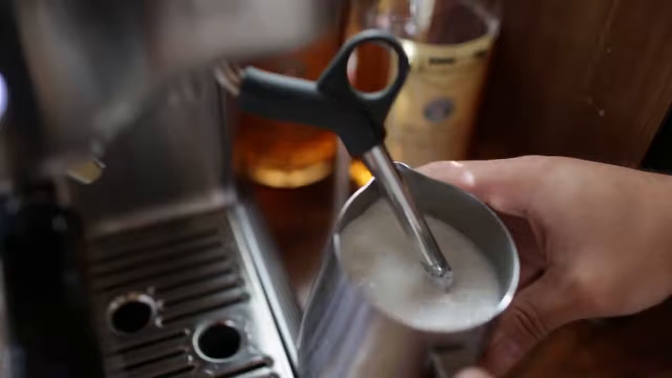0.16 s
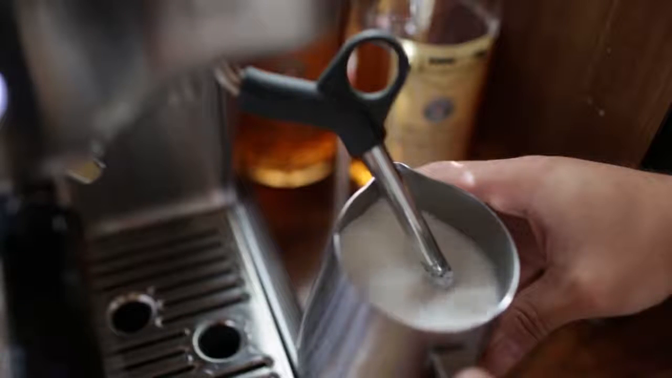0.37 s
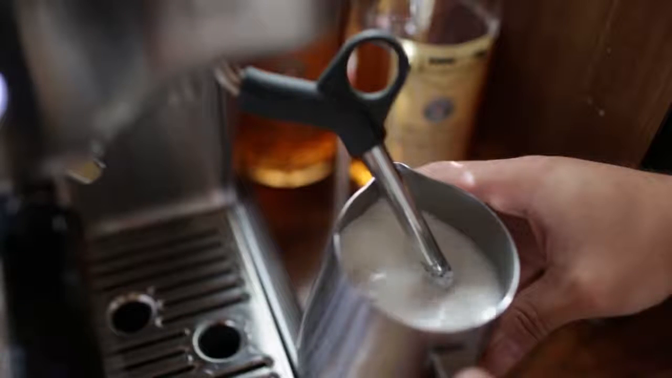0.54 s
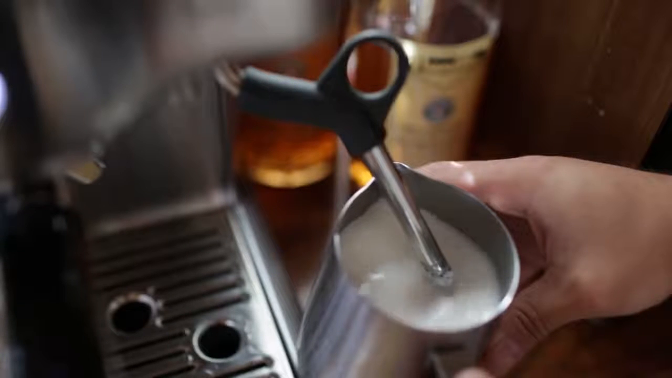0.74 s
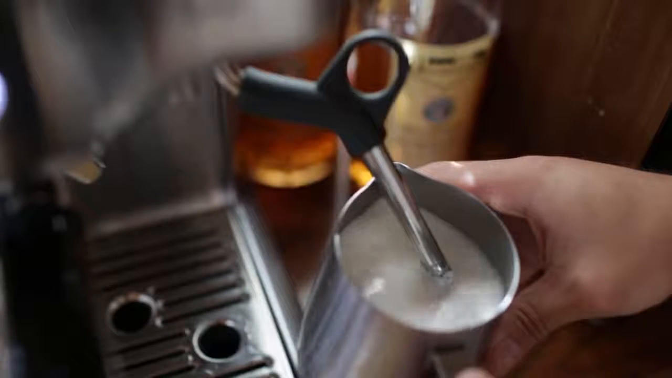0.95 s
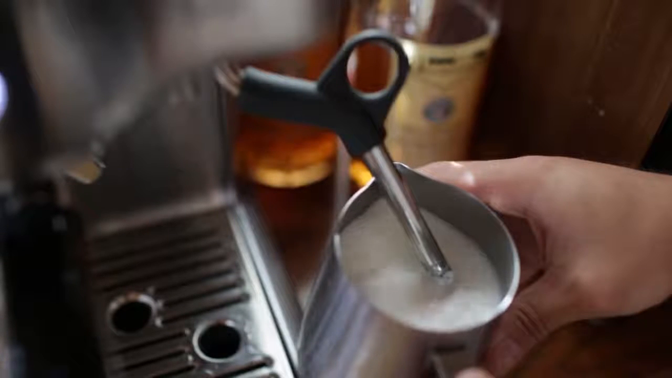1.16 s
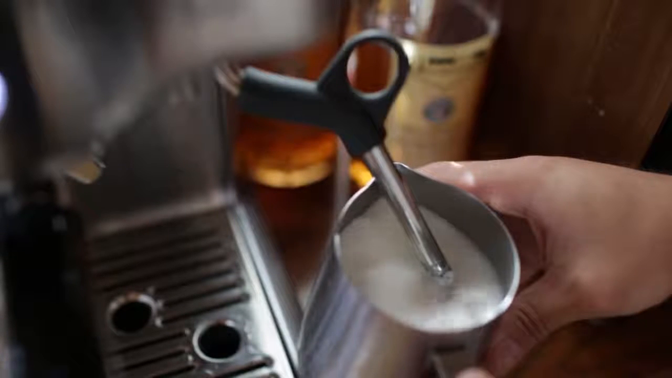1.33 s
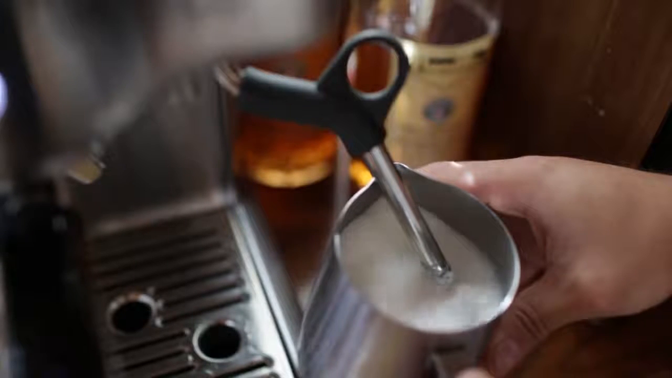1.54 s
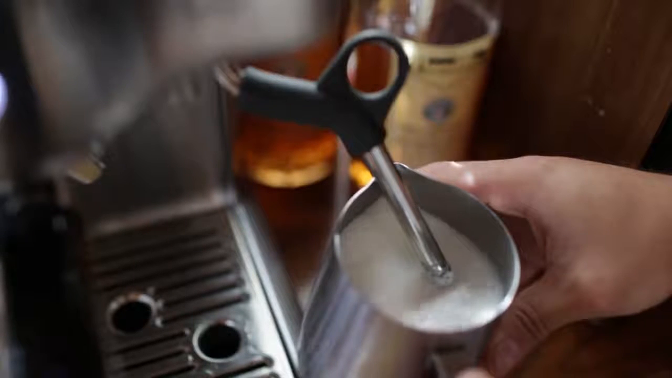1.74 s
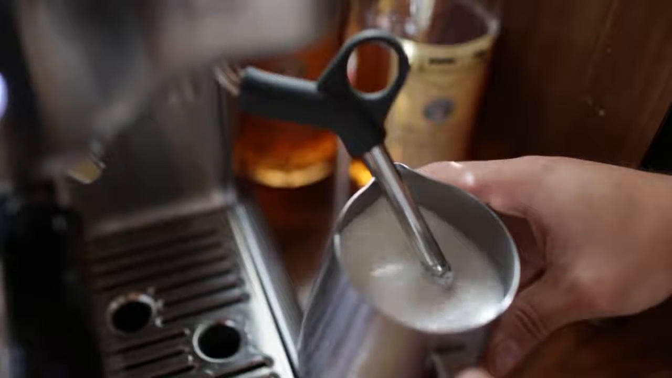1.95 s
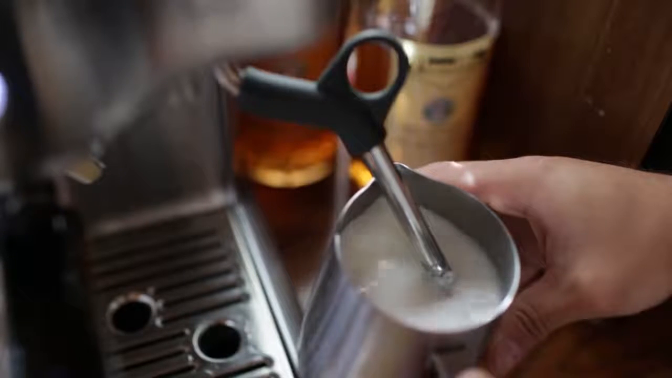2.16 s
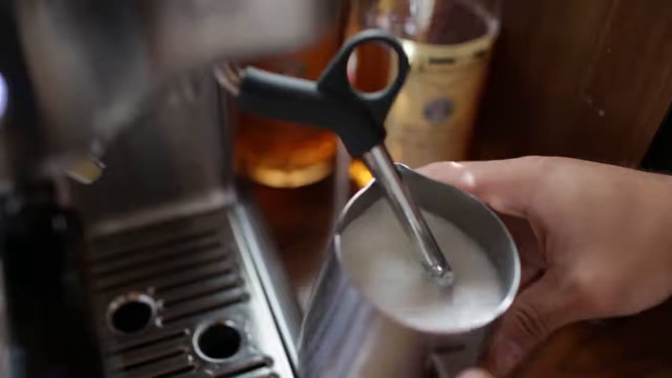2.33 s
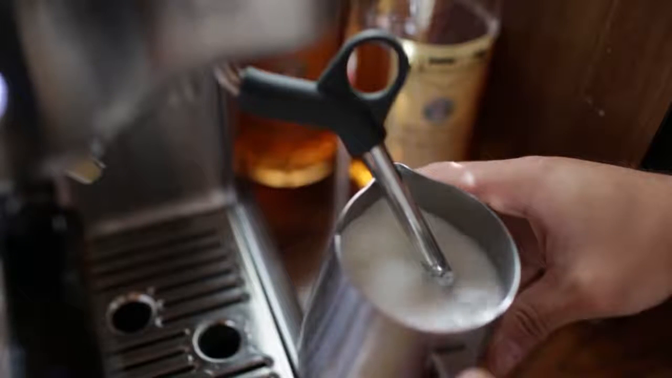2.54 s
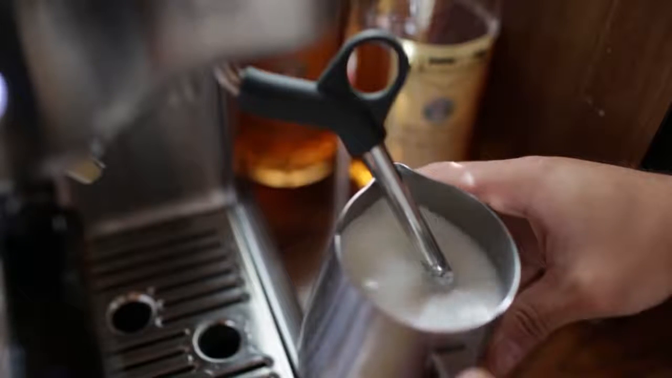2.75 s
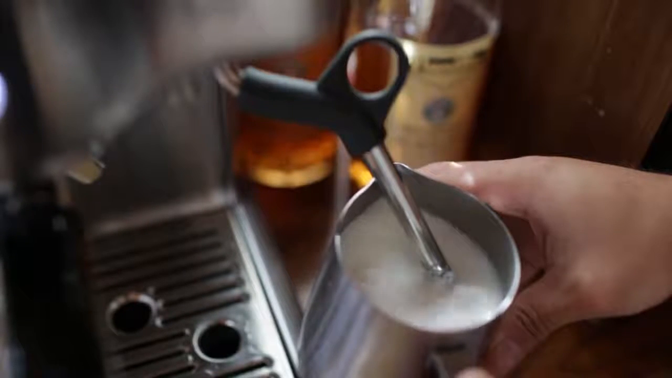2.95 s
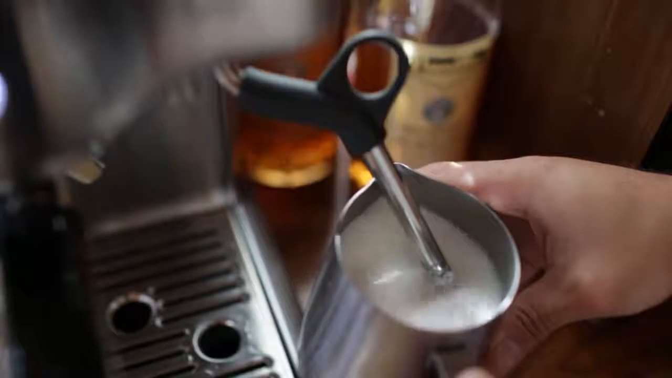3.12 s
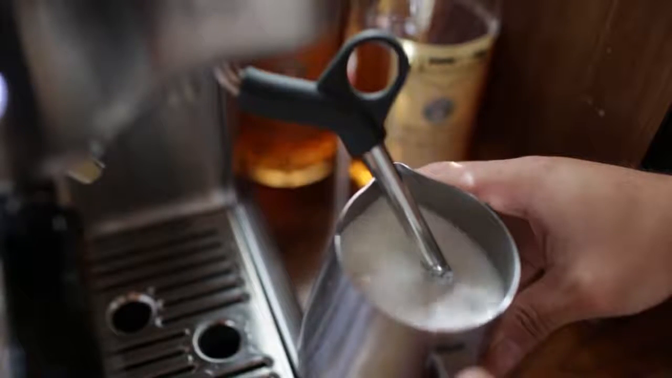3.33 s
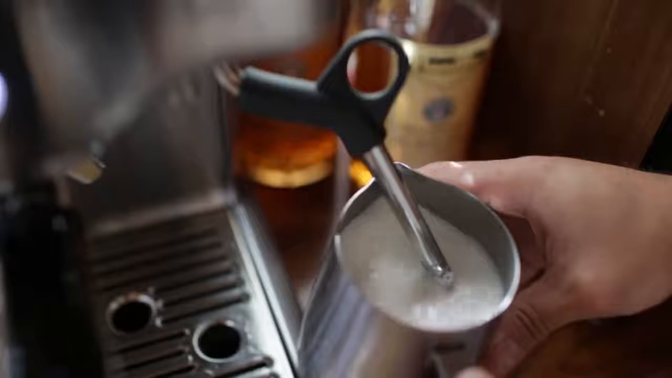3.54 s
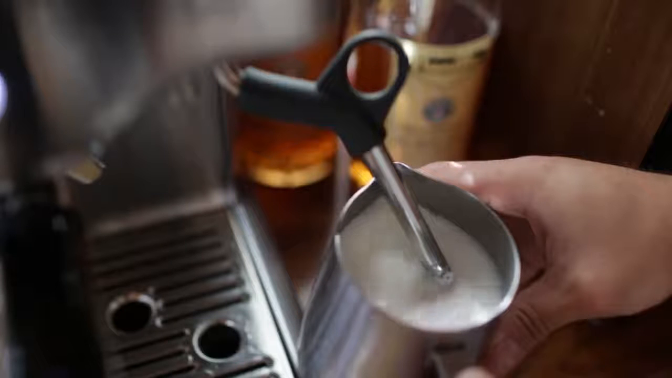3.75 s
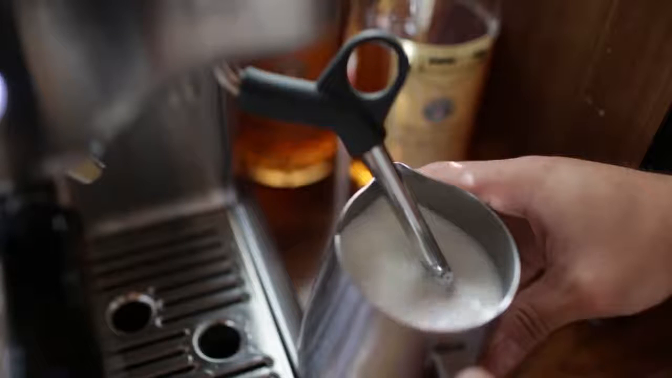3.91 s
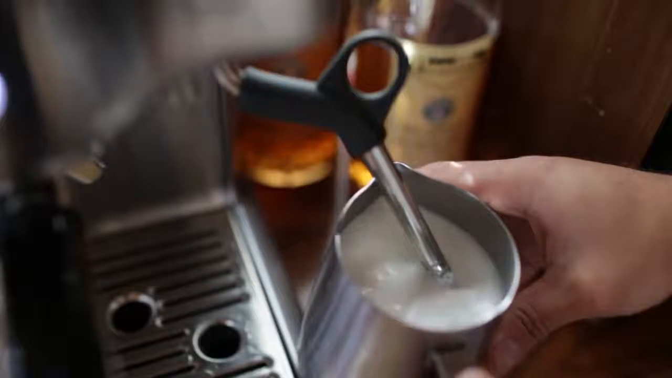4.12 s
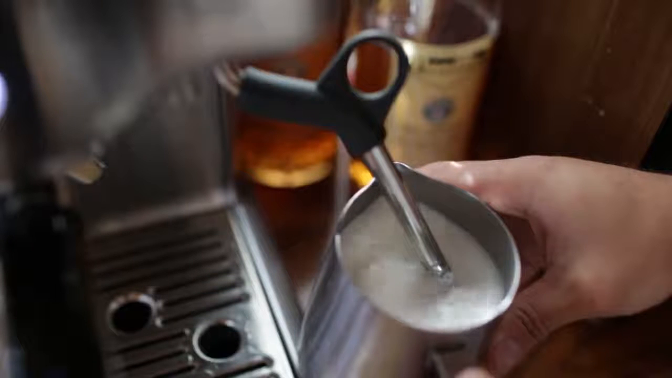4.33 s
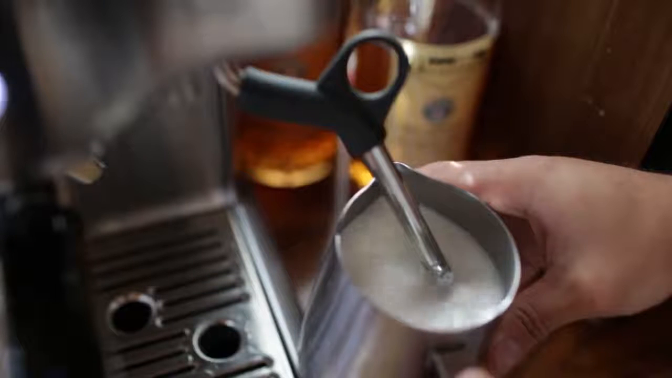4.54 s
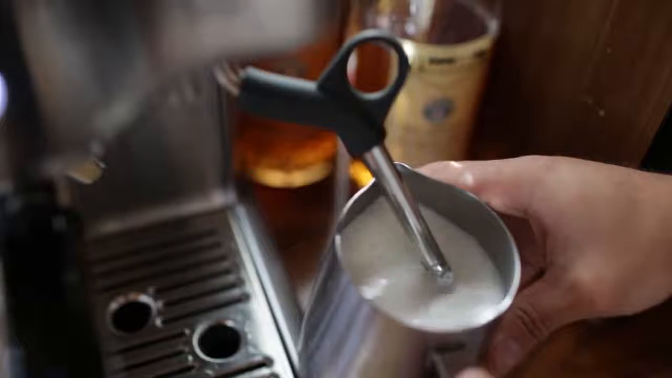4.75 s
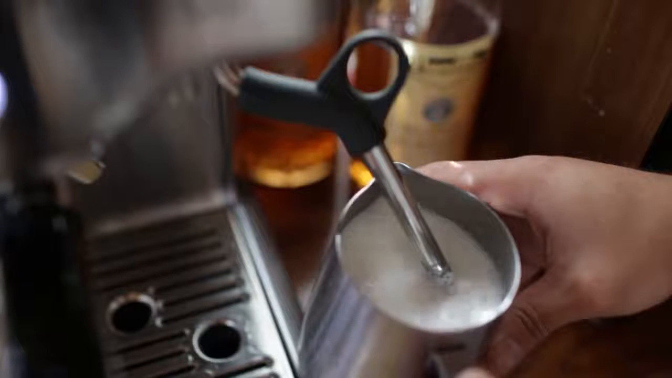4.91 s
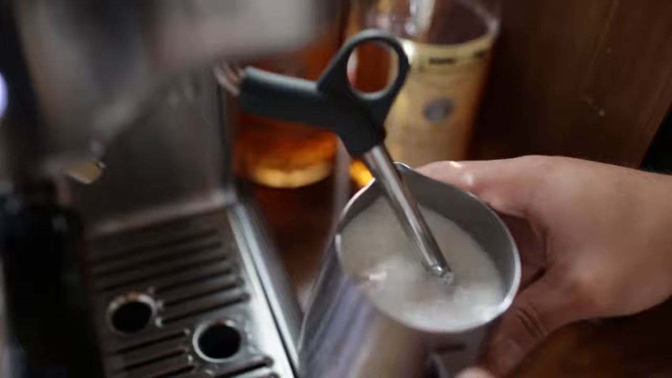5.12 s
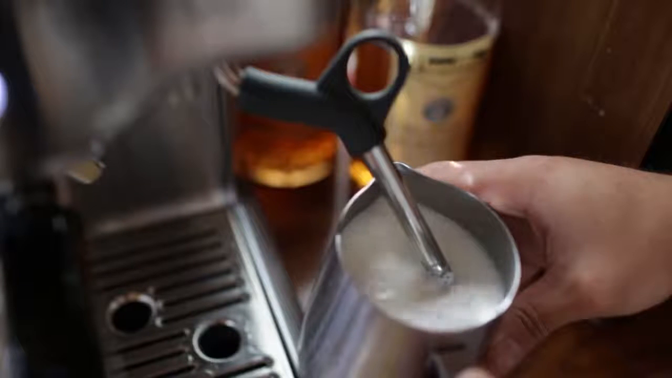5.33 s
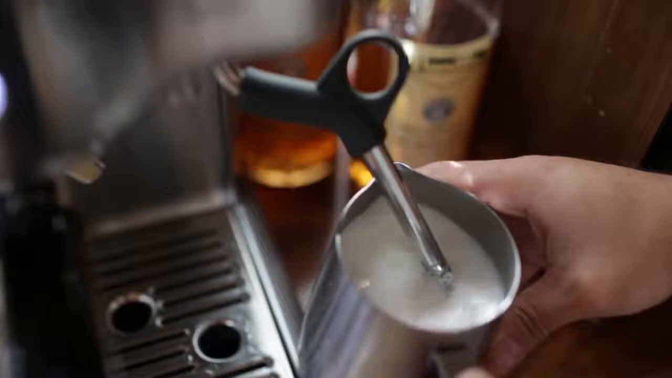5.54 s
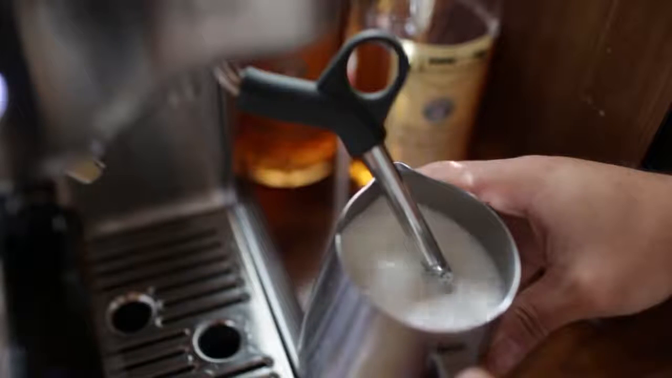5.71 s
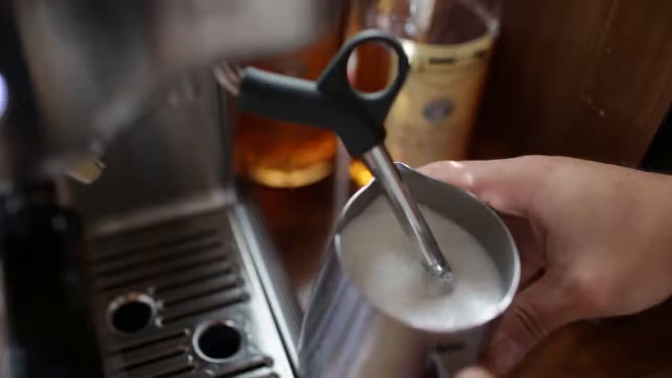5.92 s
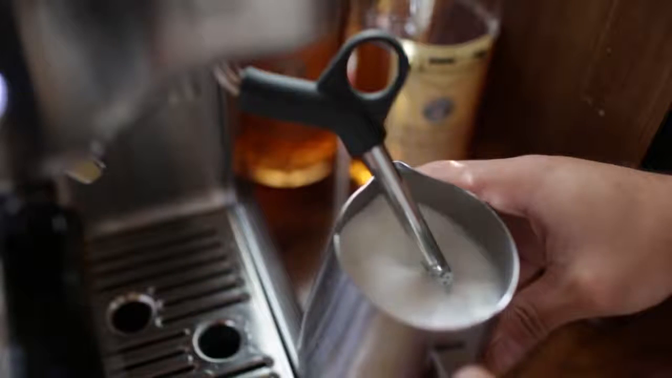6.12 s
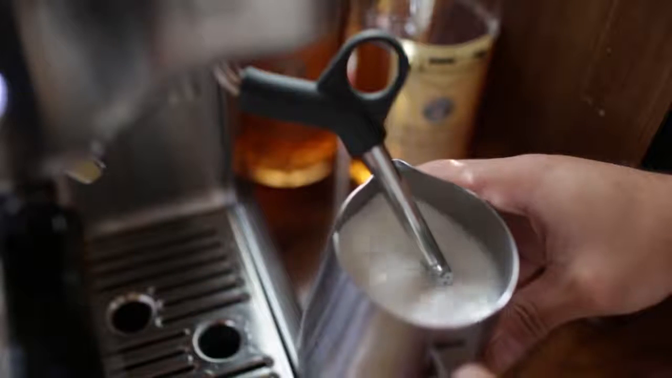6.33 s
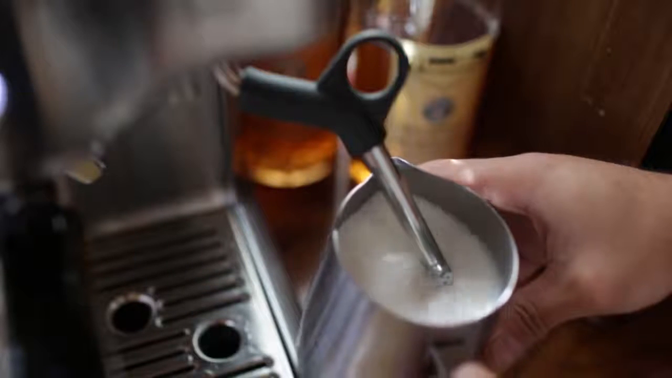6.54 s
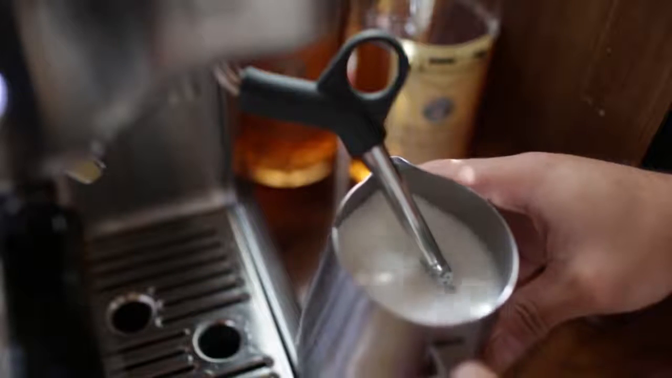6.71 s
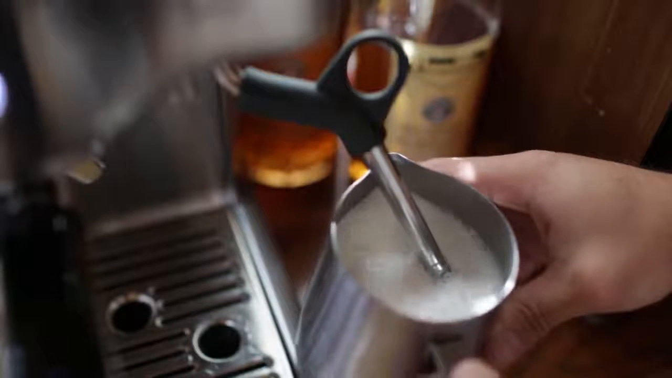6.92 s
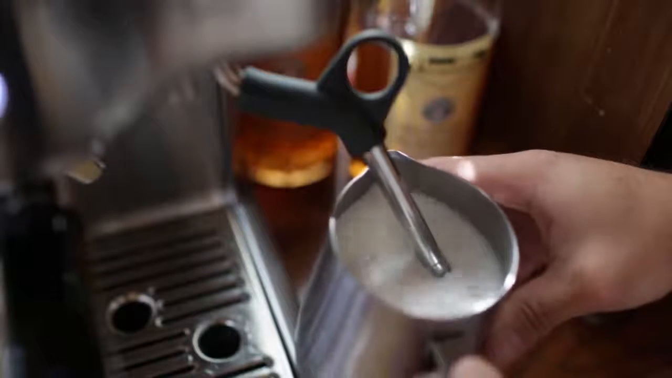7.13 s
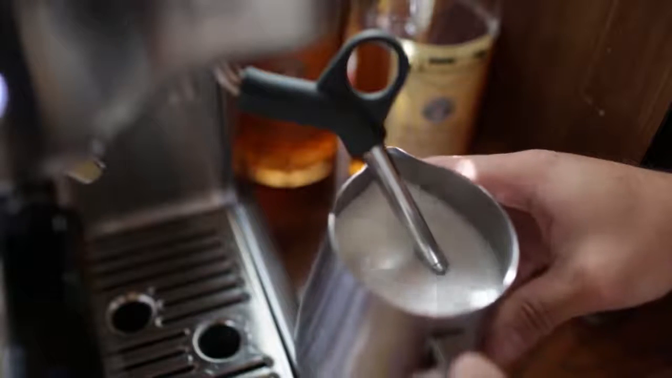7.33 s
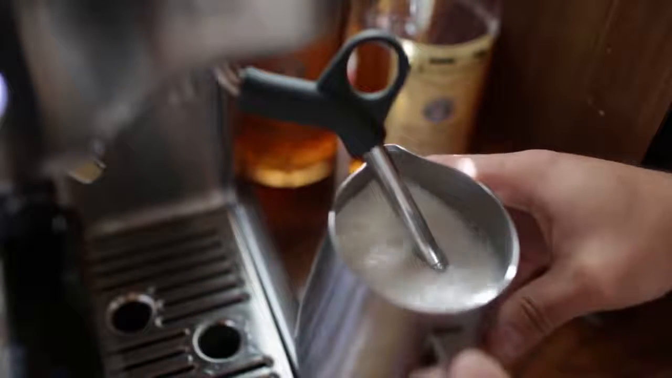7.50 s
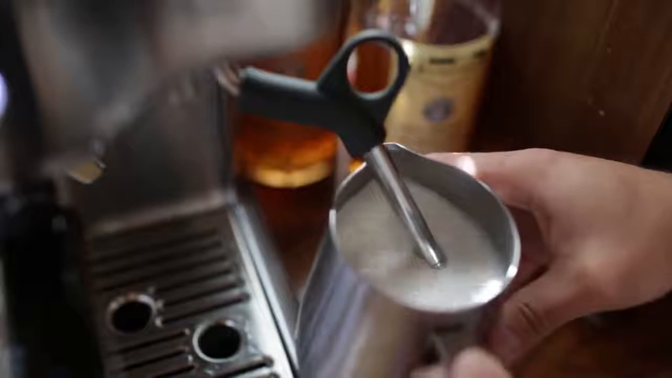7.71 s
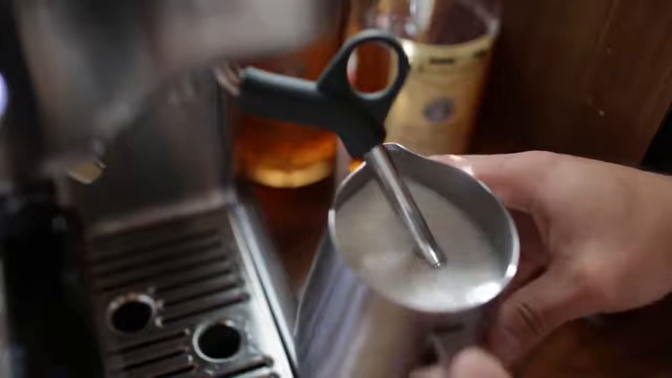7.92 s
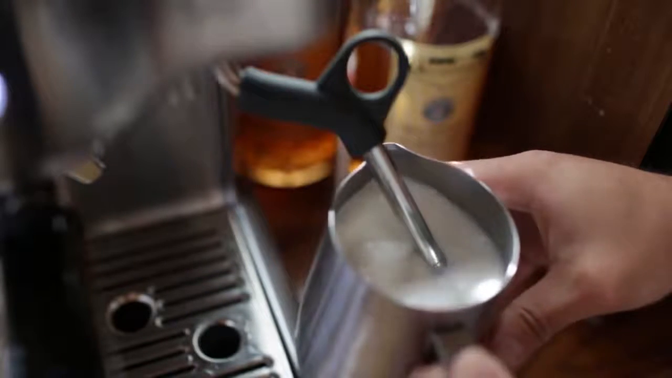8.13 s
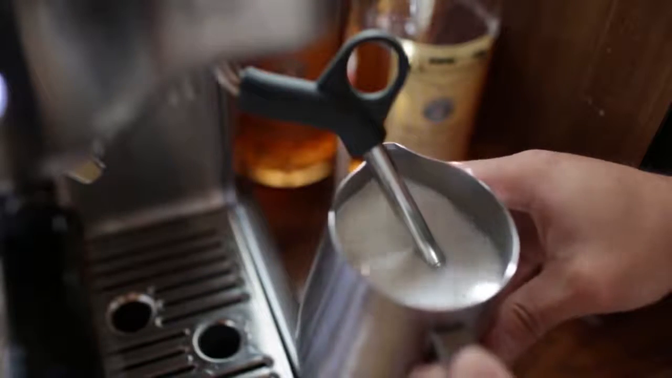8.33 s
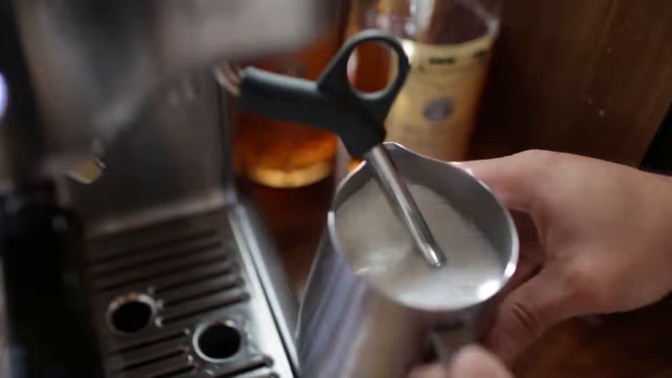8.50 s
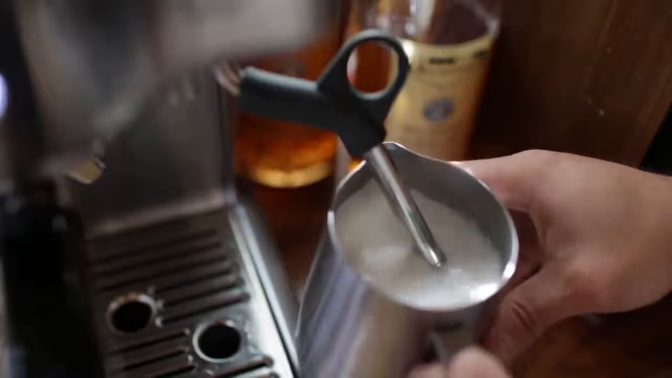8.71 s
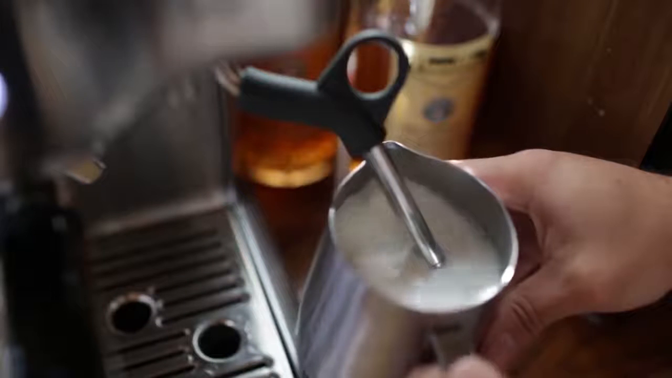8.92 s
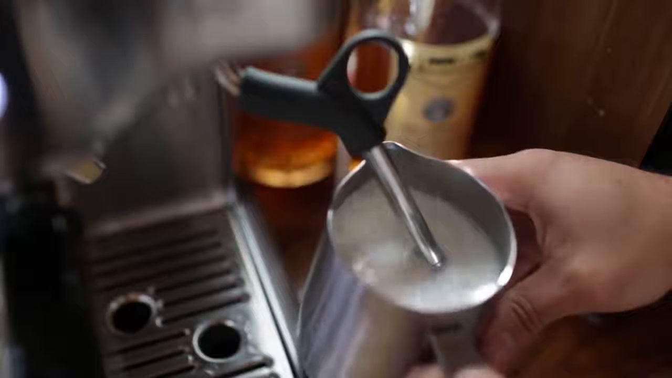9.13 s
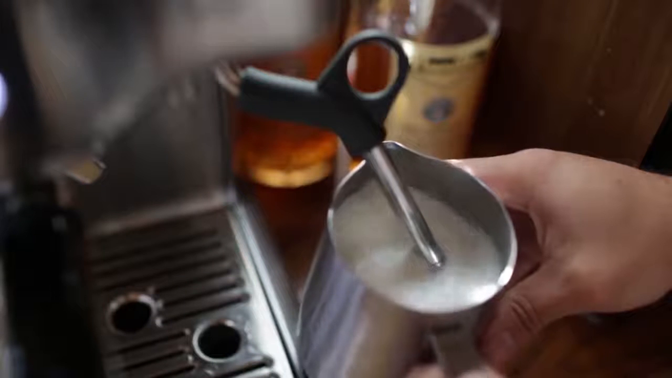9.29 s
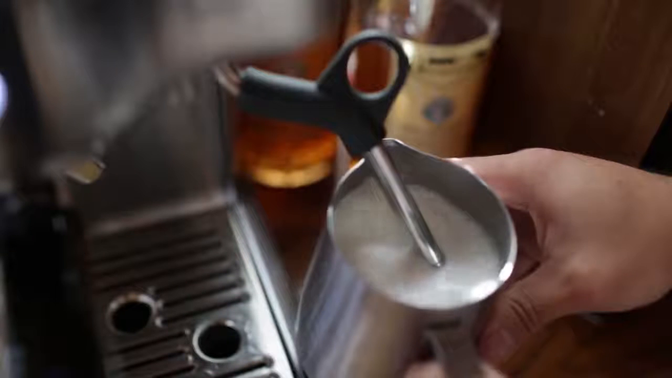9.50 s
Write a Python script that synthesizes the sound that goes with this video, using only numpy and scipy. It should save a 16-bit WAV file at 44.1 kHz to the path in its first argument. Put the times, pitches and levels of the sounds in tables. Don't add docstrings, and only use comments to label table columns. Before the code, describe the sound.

Ragged, bubbly steam hiss tears air into milk while a machine pump knocks twice a second; later the hiss turns soft and even.

```python
import sys
import numpy as np
from scipy import signal
from scipy.io import wavfile
from scipy.ndimage import uniform_filter1d

SR = 44100
rng = np.random.default_rng(int(sys.argv[2]) if len(sys.argv) > 2 else 0)


def amplitude_ratio(level_db):
    exponent = np.asarray(level_db, float) / 20
    return 10 ** exponent


def wav_record(signal):
    frames = np.transpose(np.atleast_2d(signal))
    bounded = np.clip(frames, -1, 1)
    quanta = np.round(bounded * 32767).astype(np.int16)
    wavfile.write(sys.argv[1], SR, quanta)


N = 421596

BAND_HZ = (2540, 6280)
JET_DB = (-63.5, -53, -54.5)
AIR_SHARE = (0.87, 0.36, 1)


def evened(x):
    return x / np.sqrt(np.mean(x ** 2) + 1e-20)


def read(points, hz):
    f, value = np.transpose(points)
    return np.interp(np.log(hz + 1), np.log(f + 1), value)


def add(mix, s, sound):
    part = mix[round(s * SR):][:len(sound)]
    part += sound[:len(part)]


def ring(modes, rise_ms, size=7000):
    t = np.arange(size) / SR
    total = np.zeros(size)
    for k, (hz, db, t60) in enumerate(modes):
        total += (-1) ** k * amplitude_ratio(db - 60 * t / t60) * np.sin(2 * np.pi * hz * t)
    return total * (1 - np.exp(-1000 * t / rise_ms))


def field(size, patchy_db, bins, frames):
    real, imaginary, patches = rng.standard_normal((N * 4 // size + 5, size // 2 + 1, 3)).T
    patches = uniform_filter1d(patches, size=bins, axis=0)
    patches = evened(uniform_filter1d(patches, size=frames, axis=1))
    return (real + 1j * imaginary) * amplitude_ratio(patchy_db * patches)


def sound_of(z):
    size = 2 * len(z) - 2
    return evened(signal.istft(z, nperseg=size, noverlap=size * 3 // 4)[1][:N])


# (frequency [Hz], level [dB per Hz])
KITCHEN_TONE = [(15, -11), (40, 16), (90, 0.5), (170, 3), (260, 2), (470, 0), (640, -5), (1100, -3),
                (1500, -42), (2000, -28.5)]
# (frequency [Hz], level [dB])
KITCHEN_SIDE = [(30, -1), (100, -4), (250, -10), (1000, -10)]


def kitchen():
    hz = np.fft.rfftfreq(2048, 1 / SR)
    tone = amplitude_ratio(read(KITCHEN_TONE, hz))[:, None]
    mid = field(size=2048, patchy_db=0.5, bins=5, frames=6) * tone
    side = field(size=2048, patchy_db=0.5, bins=5, frames=6) * tone
    side = side * amplitude_ratio(read(KITCHEN_SIDE, hz))[:, None]
    return amplitude_ratio(-62) * np.array([sound_of(mid + side), sound_of(mid - side)])


# (frequency [Hz], width [Hz], boost [dB])
PITCHER = [(1459, 22, -16), (1707, 24, 5.5), (2210, 80, 6), (3210, 156, 5), (3564, 91, 6.5), (4200, 390, 3),
           (5107, 330, 3.5), (7460, 350, 1.5), (10230, 300, 2.5), (13400, 390, -2.5)]


def jet_noise(z, colour_db):
    hz = np.fft.rfftfreq(512, 1 / SR)[:, None]
    pitcher_db = sum(db / (1 + (2 * (hz - f) / width) ** 2) for f, width, db in PITCHER)
    z = z * amplitude_ratio(colour_db + pitcher_db)
    above_low, above_high = [1 / (1 + (border / (hz + 1)) ** 12) for border in BAND_HZ]
    shares = (1 - above_low, above_low - above_high, above_high)
    return np.array([sound_of(z * np.sqrt(share)) for share in shares])


# (frequency [Hz], level [dB per Hz])
SURFACE = [(530, -31.5), (900, -16.5), (1300, -9), (1430, -7.5), (1600, -6), (2600, -15.5), (3510, -3),
           (4730, -8), (5020, -8), (5930, -9.5), (7440, -8), (13800, -8.5), (15600, -14)]
# (frequency [Hz], level [dB per Hz])
SUNK = [(530, -45), (900, -30.5), (1400, -11.5), (2000, -13.5), (2420, -23), (2730, -14), (3380, -9),
        (5390, -21), (6370, -20), (8890, -22), (12000, -23.5), (13200, -23), (14500, -32.5), (15800, -42)]
# (time [s], lift [dB])
AIR = [(0, 3), (.32, 10), (.64, 7.5), (.96, 12.5), (1.27, 8), (1.59, 7.5), (2, 6.5), (2.6, 5.5), (3.19, 7),
       (3.5, 4.5), (3.82, 9), (4.46, 7.5), (4.78, 3), (5.1, 11), (5.41, 3), (5.73, 6.5), (6.1, 1),
       (6.9, 2.5)]


def steady_jet():
    t, hz = np.arange(N) / SR, np.fft.rfftfreq(512, 1 / SR)
    z = field(size=512, patchy_db=2.5, bins=6, frames=12)
    sunk = np.interp(np.arange(z.shape[1]) * 128 / SR, (6.3, 7.2), (0, 1))
    surface_db = read(SURFACE, hz)[:, None]
    sunk_db = (read(SUNK, hz) - np.interp(hz, BAND_HZ, (-1.5, -6)))[:, None]
    bands = jet_noise(z, surface_db + sunk * (sunk_db - surface_db))
    air_db = np.interp(t, *np.transpose(AIR))
    flicker_db = 0.59 * evened(uniform_filter1d(rng.standard_normal(N), size=900))
    level_db = [db + share * air_db + flicker_db for db, share in zip(JET_DB, AIR_SHARE)]
    return (bands * amplitude_ratio(level_db)).sum(0)


# (time of peak [s], level [dB], length [ms])
SLURPS = [(0.071, -39.5, 26), (0.491, -34.5, 27.6), (1.187, -40, 27), (1.263, -42, 29), (1.438, -48.5, 48),
          (1.689, -38.5, 31), (1.933, -43, 13), (2.197, -47.5, 26), (3.035, -42.5, 31), (3.172, -45, 64),
          (3.441, -42, 77), (3.666, -45, 18), (3.788, -36, 21), (3.922, -51, 15), (4.117, -44, 24),
          (4.333, -42, 15), (4.514, -38, 17), (4.553, -40.5, 72), (4.785, -41, 46), (4.964, -45, 19),
          (5.025, -33.5, 28), (5.58, -47, 70), (6.055, -42.5, 29), (6.258, -49.5, 84), (6.61, -56, 210)]
# (time of peak [s], level [dB], length [ms])
SIPS = [(.148, -40.5, 23), (.285, -46, 79), (0.405, -30.5, 31), (1.049, -33.5, 19), (1.296, -35.5, 20),
        (1.517, -39, 14), (1.555, -35, 12), (1.593, -36.5, 34), (1.669, -39.5, 16), (2.17, -43.5, 28),
        (2.47, -39.5, 27), (2.8, -60, 25), (3.119, -40.5, 55), (3.41, -33.5, 23), (4.018, -40.5, 87),
        (4.146, -36.5, 12), (4.663, -42, 47), (5.137, -39, 37), (5.319, -36.5, 50), (6.231, -37, 38)]
# (time of peak [s], level [dB], length [ms])
SPITS = [(0.723, -24.5, 24), (.818, -28, 5.9), (0.863, -32, 18), (.927, -33.5, 22), (1.115, -30.5, 17),
         (1.414, -40, 10), (1.796, -34, 24), (1.962, -44, 130), (2.142, -40.5, 45), (2.368, -40.5, 21),
         (2.538, -35.5, 34), (2.649, -40, 53), (2.753, -36, 29), (3.274, -36, 24), (3.548, -42.5, 25),
         (3.613, -38.5, 22), (4.239, -39.5, 30), (4.436, -43, 12), (4.962, -29.5, 28), (5.202, -39.5, 24),
         (5.272, -37, 12), (5.338, -27.5, 3.8), (5.856, -43, 9.8), (6.148, -39, 66), (6.216, -38, 11)]
# (time of peak [s], level [dB], length [ms])
SWALLOWS = [(0.754, -35, 46), (1.016, -43, 56), (1.207, -34.5, 10), (1.324, -32.5, 52), (1.467, -40, 18),
            (2.014, -39, 41), (2.295, -34.5, 53), (2.553, -35, 20), (2.72, -38.5, 18), (2.941, -44, 16),
            (3.503, -45, 18), (3.859, -42.5, 38), (4.414, -41, 17), (4.631, -45, 41), (5.089, -42, 35),
            (5.182, -42, 19), (6.087, -40.5, 59), (8.048, -56, 32), (8.322, -55, 38), (8.87, -55, 20),
            (9.533, -55, 20)]
# (gurgle [dB], ring [dB], fizz [dB], share of length spent swelling [0-1])
KINDS = [
    (-3, -1.5, 1, 0.54),
    (-16.5, -3.7, -2.4, .49),
    (-15, -24.5, -1.14, 0.49),
    (-10.5, -0.9, -6, 0.5),
]


def gulp_rows():
    rows = []
    for table, (*colour, share) in zip((SLURPS, SIPS, SPITS, SWALLOWS), KINDS):
        for s, db, ms in table:
            rows.append((s, db + np.array(colour), share * ms, (1 - share) * ms))
    sputter_per_s, sputter_db, half_ms, tint_db = 9.7, -65.5, 17.4 / 2, 6
    luck = rng.standard_normal((200, 5))
    times = np.cumsum(np.exp(0.6 * luck[:, 0])) / sputter_per_s
    for s, (_, size, *tint) in zip(times[times < N / SR], luck):
        air_db = np.interp(s, *np.transpose(AIR)) * np.sum(AIR_SHARE)
        db = air_db + sputter_db + tint_db * np.array(tint)
        rows.append((s, db + KINDS[0][:3], half_ms * np.exp(0.3 * size), half_ms * np.exp(0.79 * size)))
    return rows


def pings(strength):
    pings_per_s, t60, rise_s, spread = 330, 0.025, 0.003, 0.05
    t, out = np.arange(1024) / SR, np.zeros(N)
    size = amplitude_ratio(4.0 * np.minimum(rng.exponential(1, N), 3))
    size = size * (rng.random(N) < pings_per_s / SR)
    which = rng.integers(0, len(PITCHER), N)
    for k, (hz, _, _) in enumerate(PITCHER):
        hz = hz * (1 + spread * rng.standard_normal())
        tone = np.sin(2 * np.pi * hz * t) * amplitude_ratio(-60 * t / t60) * (1 - np.exp(-t / rise_s))
        band = np.searchsorted(BAND_HZ, hz)
        out += signal.oaconvolve(size * (which == k) * strength[band], tone)[:N]
    return amplitude_ratio(0.5) * out


def gulps():
    t, hz = np.arange(N) / SR, np.fft.rfftfreq(512, 1 / SR)
    power = np.zeros((3, N))
    for peak, db, rise, fall in gulp_rows():
        near = slice(max(round((peak - 0.15) * SR), 0), round((peak + 0.2) * SR))
        ms = 1000 * (t[near] - peak)
        swell = np.exp(-1.3 * abs(ms / rise) ** 1.39)
        collapse = np.exp(-1.3 * abs(ms / fall) ** 1.07)
        shape = np.where(ms < 0, swell, collapse)
        if rise + fall < 24:
            shape = shape + 0.6 * np.exp(-(ms / 0.86) ** 2)
        power[:, near] += amplitude_ratio(db)[:, None] ** 2 * shape
    strength = np.sqrt(power)
    tearing = amplitude_ratio(0.5 * evened(uniform_filter1d(rng.standard_normal(N), size=90)))
    noise = jet_noise(field(size=512, patchy_db=3.5, bins=8, frames=4), read(SURFACE, hz)[:, None])
    return (noise * strength * tearing).sum(0) + pings(strength)


# (time [ms], body level [dB], casing level [dB])
STROKE = [
    (0.094, -1.5, -1),
    (6.98, -13, -0.5),
    (11.63, -1, 0.5),
    (17.04, -10.5, -1),
    (29.62, -10, -10),
    (40.76, -6, -11.5),
]
# (frequency [Hz], level [dB], time to die by 60 dB [s])
BODY = [(155.6, -6.5, 0.059), (241.4, -10, 0.21), (262, -21, 0.22), (303.6, 4.5, 0.054), (359.5, -10, 0.17),
        (388, 5, 0.032), (492, -4, 0.058), (530, -6, 0.038), (655, -3, 0.038), (786, 3, 0.032),
        (862, 7.5, 0.01), (942, -2.5, 0.034)]
# (frequency [Hz], level [dB], time to die by 60 dB [s])
CASING = [(1124, -8.5, 0.021), (1414, -5, 0.019), (1614, -6.5, 0.056), (1740, -8, 0.039),
          (2020, -6.5, 0.039), (2540, -8, 0.017), (2970, -11, 0.02), (3390, -8, 0.025), (4240, -7, 0.0091),
          (5440, -0.5, 0.0031), (7700, 5, 0.0015)]


def pump():
    start_s, period_s = 0.3885, 0.51669
    body, shake, casing = np.zeros((3, N))
    for s in np.arange(start_s, N / SR, period_s):
        chance = rng.standard_normal((len(STROKE), 3))
        for (ms, body_db, casing_db), (a, b, c) in zip(STROKE, chance):
            add(body, s + (ms + 0.11 * c) / 1000, amplitude_ratio([body_db + 1.5 * a]))
            add(shake, s + ms / 1000, amplitude_ratio(body_db - 23.5) * np.hanning(500))
            add(casing, s + ms / 1000, amplitude_ratio(casing_db + 0.5 * b) * np.hanning(380))
    body = body + shake * rng.standard_normal(N)
    casing = casing * rng.standard_normal(N) / 9
    knock = signal.oaconvolve(body, ring(BODY, 2.2))[:N]
    rattle = signal.oaconvolve(casing, ring(CASING, 0.043))[:N]
    return amplitude_ratio(-43) * knock + amplitude_ratio(-40) * rattle


# (time [s], level [dB])
BUMP = [
    (9.385, -49),
    (9.395, -52),
    (9.405, -48.5),
    (9.414, -53),
    (9.431, -57),
    (9.461, -67.5),
]
# (frequency [Hz], level [dB], time to die by 60 dB [s])
COUNTER = [(297, -0.5, 0.15), (403, 1, 0.12), (445, 7.5, 0.046), (556, 7, 0.049), (653, -4, 0.12),
           (805, -6, 0.051), (970, -1, 0.054), (1210, -1, 0.055), (1444, 2, 0.04)]


def bump():
    blows = np.zeros(N)
    for s, db in BUMP:
        add(blows, s, amplitude_ratio(db) * rng.standard_normal(450) * np.hanning(450) / 11)
    return signal.oaconvolve(blows, ring(COUNTER, 2.1))[:N]


# (frequency [Hz], time to die by 60 dB [s])
ROOM = [(200, 0.56), (1000, 0.14), (4000, 0.026), (12000, 0.43)]
# (frequency [Hz], level [dB])
WET = [(60, -4), (250, -25), (600, -6), (1200, -9.5), (2200, -6.5), (4000, -8.5), (8000, -11.5),
       (12000, -14)]


def room(x):
    taps = np.zeros((2, SR // 2))
    at = np.arange(100, SR // 2 - 20, 20)
    at = at + rng.integers(0, 20, (2, len(at)))
    np.put_along_axis(taps, at, rng.choice([-1., 1.], at.shape), 1)
    hz, t, z = signal.stft(taps, SR, nperseg=256)
    t60 = read(ROOM, hz)[:, None]
    z = z * amplitude_ratio(-60 * t / t60 + read(WET, hz)[:, None])
    z = z * np.sqrt(6 * np.log(10) * 20 / SR / t60)
    echoes = signal.istft(z, SR, nperseg=256)[1]
    return signal.fftconvolve(x[None], echoes, axes=1)[:, :N]


def scene():
    near = steady_jet() + gulps() + pump() + bump()
    middle, width = room(near)
    return amplitude_ratio(-3.0) * near + amplitude_ratio(-1.5) * middle + np.array([width, -width]) + kitchen()


def band_db(z, size):
    power = np.add.reduceat(abs(z) ** 2, np.arange(0, len(z), size)) / size
    return 10 * np.log10(power + 1e-16)[np.arange(len(z)) // size]


def roll_off(x):
    return signal.sosfilt(signal.butter(12, 15730, fs=SR, output="sos"), x)


# (frequency [Hz], distance under the whole [dB])
GATE = [(40, 46), (130, 39), (250, 37.5), (400, 40.5), (700, 41), (1200, 39.5), (2400, 47), (6000, 61),
        (12000, 52), (13400, 38), (15000, 31.5)]
# (frequency [Hz], level [dB])
HEARING = [(11000, -108), (12800, -96), (13300, -89), (14500, -91), (15600, -86)]
# (frequency [Hz], distance under the middle [dB])
WIDTH_GATE = [(1000, 27), (2500, 10), (3300, 7.5), (4100, 5), (5000, 11.5), (7500, 39), (9000, 12.5),
              (12000, 25), (14000, 55)]


def record(dry):
    hz, t, z = signal.stft(dry, SR, nperseg=2048, noverlap=1024)
    z = z / np.sqrt(1 + (150 / (hz[:, None] + 1)) ** 4)
    mid, side = (z[0] + z[1]) / 2, (z[0] - z[1]) / 2
    whole = uniform_filter1d((abs(mid) ** 2).sum(0), size=3, origin=1)
    waver_db = 1.1 * evened(uniform_filter1d(rng.standard_normal(len(t)), size=4))
    loud_db = 0.7 * 10 * np.log10(whole + 1e-16) - 14.0 + waver_db
    loud_db = np.minimum(loud_db, 1.8 * loud_db + 38)
    limit_db = np.maximum(loud_db - read(GATE, hz)[:, None], read(HEARING, hz)[:, None])
    streaks = evened(uniform_filter1d(rng.standard_normal((257, len(t))), size=4))
    streak_db = 4.5 * streaks[np.arange(len(hz)) // 4]
    streak_db = streak_db * np.interp(hz, (9000, 13000), (0.2, 1))[:, None]
    heard = band_db(mid, size=4) > limit_db + streak_db
    whims = uniform_filter1d(rng.standard_normal((65, len(t))), size=2)
    side_db = band_db(side, size=16) + 3.5 * whims[np.arange(len(hz)) // 16]
    wide = side_db > band_db(mid, size=16) - read(WIDTH_GATE, hz)[:, None]
    z = heard * np.array([mid + wide * side, mid - wide * side])
    mix = signal.istft(z, SR, nperseg=2048, noverlap=1024)[1][:, :N]
    return roll_off(mix)


dry = scene()
out = record(dry)
wav_record(out)
```